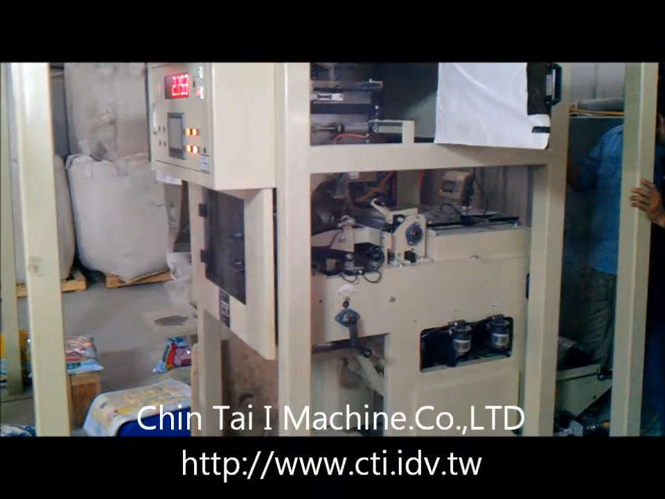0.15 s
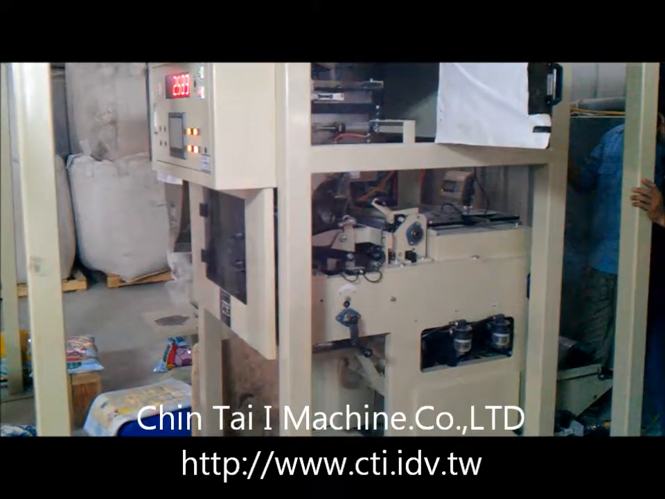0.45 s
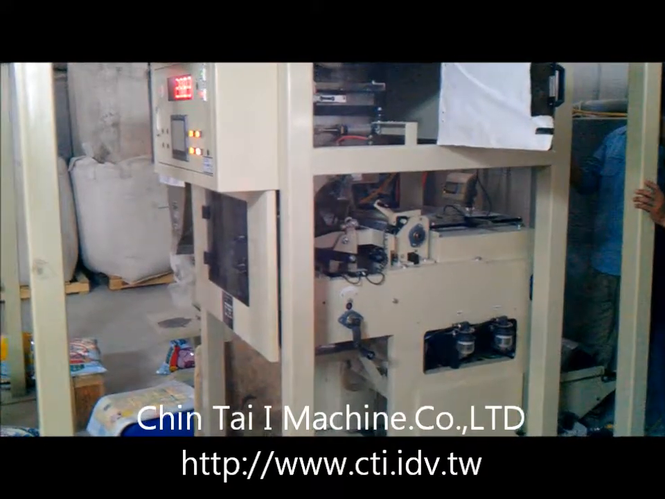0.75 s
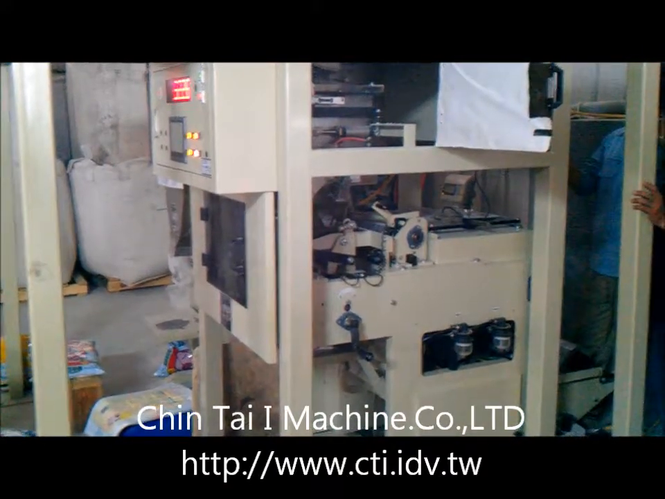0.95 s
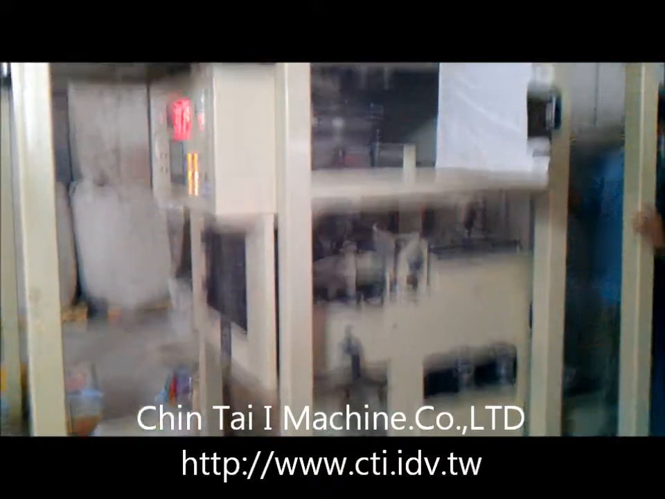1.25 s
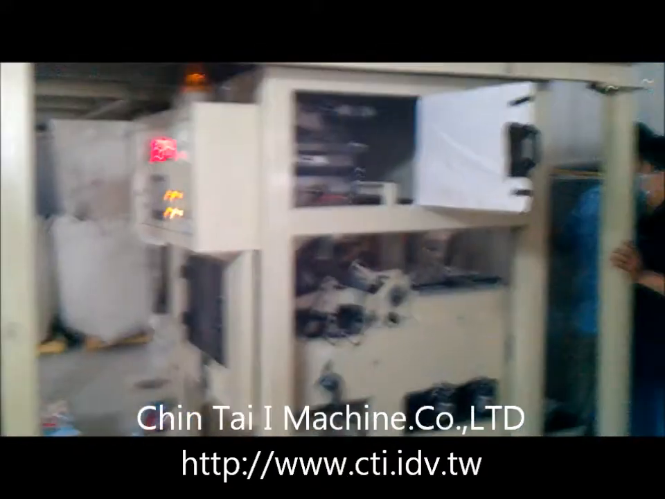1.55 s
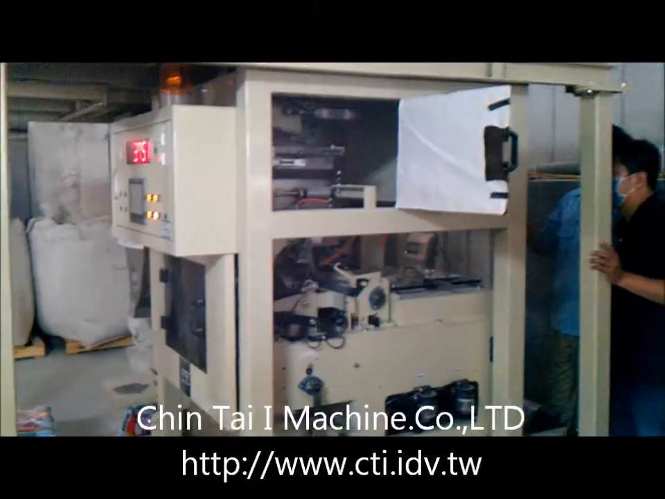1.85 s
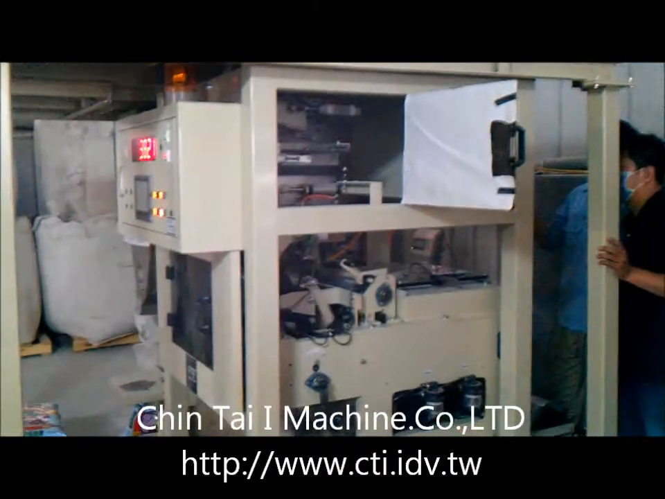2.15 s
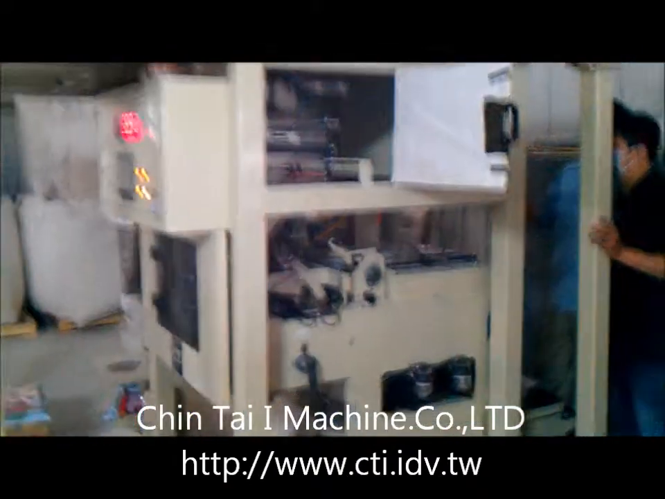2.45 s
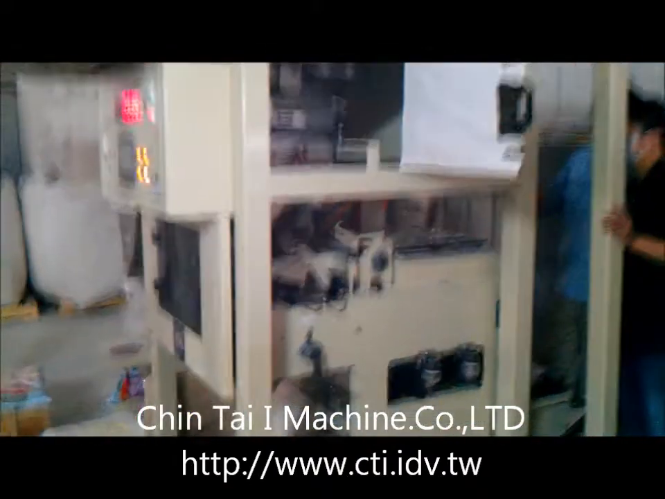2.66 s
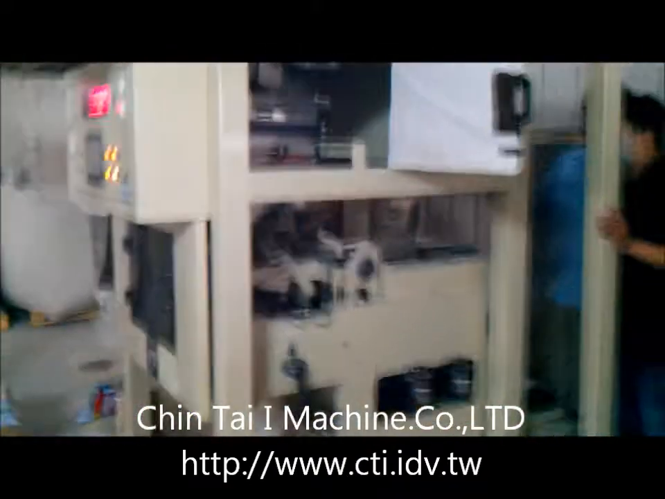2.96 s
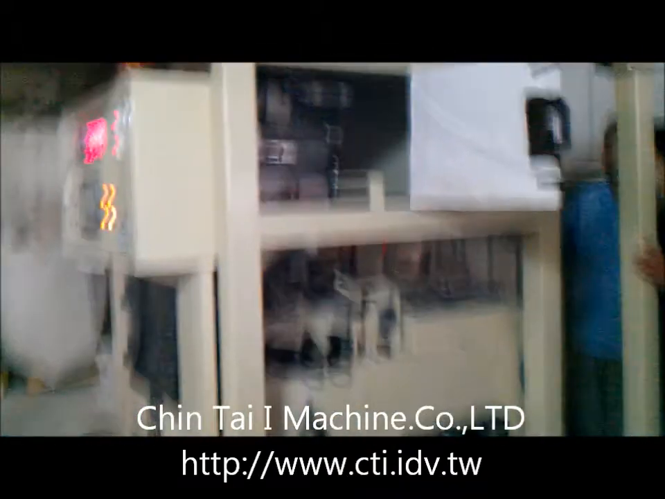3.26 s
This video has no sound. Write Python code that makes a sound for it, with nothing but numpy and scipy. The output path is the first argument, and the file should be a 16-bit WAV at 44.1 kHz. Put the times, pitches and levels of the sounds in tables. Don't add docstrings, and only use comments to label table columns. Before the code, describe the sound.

A packing machine hums, whines and chugs with rapid air puffs, stops, then a loud air jet opens and holds with scattered clanks, in a noisy factory hall, close overloaded phone microphone.

```python
import sys
import numpy as np
from scipy import signal
from scipy.fft import rfft, irfft
from scipy.io import wavfile
from scipy.ndimage import uniform_filter1d

SR = 44100
rng = np.random.default_rng(int(sys.argv[2]) if len(sys.argv) > 2 else 0)


def master(y):
    cut = np.clip(np.atleast_2d(y).T, -1, 1)
    pcm = np.round(cut * 32767)
    wavfile.write(sys.argv[1], SR, pcm.astype(np.int16))


def gain_from_db(level_db):
    decades = np.asarray(level_db, float) / 20
    return 10 ** decades


N = 149940
t = np.arange(N) / SR

# pitch_hz, density_db (per Hz)
HALL_SPECTRUM = [(25, -34.5), (150, -8), (450, -8.5), (800, -7), (2000, -8), (3400, -15.5), (7900, -16),
                 (15500, -21)]
# pitch_hz, level_db (rms)
MOTOR_TONES = [(346.8, -43.5), (693.7, -47.5), (867.1, -47), (1736, -53)]
# pitch_hz, level_db (rms)
GEAR_TONES = [(384.2, -36), (563.2, -48.5), (666.1, -41.5), (896.4, -50), (1114, -56), (2081, -47),
              (5148, -41.5)]
# place_turns (0-1), puff_db, thump_db
CAM_STROKES = [
    (.51, -23.5, -30),
    (0.79, -23.5, -26.5),
    (0.15, -32, -35),
    (0.4, -32, -60),
]
# pitch_hz, density_db (per Hz)
PUFF_SPECTRUM = [(3240, -40), (5500, -24), (7990, 5), (8950, 1.5), (12500, -3.5), (15500, -36)]
# time_s, level_db
LEAK_LEVEL = [(0, -24.5), (.3, -30), (.385, -21.5), (.45, -26.5), (.57, -27.5), (.62, -21.5), (.7, -28.5),
              (.78, -36), (.94, -30.5)]
# start_s, level_db, bright_share (0-1), fade_s, ring_hz
CLANK_HITS = [(.375, -18.5, 0.75, 0.0078, 850), (.612, -19, 0.8, 0.017, 4300),
              (1.7243, -20.5, 0.99, 0.08, 4770), (1.8414, -22, 0.84, 0.05, 2240),
              (1.9472, -16.5, 0.76, 0.014, 1590), (2.1234, -22, 0.64, 0.065, 5050),
              (2.166, -28, .1, 0.041, 310), (2.2941, -20.5, 0.66, 0.05, 1064), (2.715, -29, .1, 0.022, 980),
              (2.739, -23, 0.73, 0.022, 2230), (2.7725, -18.5, 0.82, 0.014, 4400),
              (2.8409, -23.5, 0.5, 0.015, 3360), (2.8993, -23.5, 0.1, 0.022, 190),
              (3.11, -32.5, 0, 0.016, 152), (3.309, -28, .3, 0.034, 183), (3.3408, -24, 0.3, 0.023, 868),
              (3.357, -24, 0, 0.018, 1940)]
# pitch_hz, density_db (per Hz)
JET_BEFORE = [(1500, -29), (3600, -23.5), (6300, -16), (7500, -7), (8640, -1.5), (10700, -8.5),
              (12000, -14), (15500, -21)]
# pitch_hz, density_db (per Hz)
JET_AFTER = [(1500, -28.5), (2600, -34.5), (4300, -22.5), (6000, -19), (8400, -1), (10000, -4),
             (12000, -12.5), (15500, -21)]
# pitch_hz, width_hz, before_db, after_db
NOZZLE_PEAKS = [(7356, 74, -26, -30.5), (7870, 430, -19, -27), (8830, 240, -21, -33),
                (9410, 160, -26.5, -34), (10750, 350, -30.5, -41), (12300, 250, -34, -56),
                (14400, 470, -45, -43), (8580, 580, -42, -23), (9600, 1500, -30, -23.5)]
# time_s, gain_db
PHONE_GAIN = [(0, -0.5), (.945, -3), (.99, -8), (1.7, -16.5), (1.95, -6), (2.1, -6.5), (2.7, -7), (2.9, -8),
              (2.96, -3), (3.2, -2.5), (3.23, -7), (3.28, -2), (3.4, -10)]
# time_s, ceiling_amplitude
INPUT_CEILING = [(0, .45), (.948, .45), (.965, .275), (2.15, .275), (2.4, .34), (3.3, .38), (3.36, .5)]
# centre_s, low_hz, high_hz
SPLIT_BANDS = [(1.019, 11691, 13114), (1.02, 8160, 11133), (1.157, 4628, 5707), (1.228, 8160, 10444),
               (1.273, 14448, 15870), (1.297, 8935, 10444), (1.39, 4198, 5190), (1.39, 14448, 15870),
               (1.612, 4198, 5707), (1.622, 6868, 9066), (2.04, 5662, 6912), (2.04, 8160, 9755),
               (2.18, 5662, 6912), (2.18, 7471, 9066), (2.366, 4198, 5190), (2.366, 10227, 11822),
               (2.366, 12380, 13803), (2.436, 13758, 15870), (2.992, 5662, 7601), (3.109, 4198, 5707)]

TURN_S = 0.0781
OPEN_S, SHIFT_S = 0.9415, 2.087


def level(x, db):
    return x * gain_from_db(db) / np.sqrt(np.mean(x ** 2))


def walk(rate_hz):
    hold = int(SR / rate_hz)
    steps = np.repeat(rng.standard_normal(N // hold + 1), hold)
    return 1.34 * uniform_filter1d(uniform_filter1d(steps, hold), hold)[:N]


def peak(hz, width_hz, size=N):
    f = np.fft.rfftfreq(size, 1 / SR) + 1
    response = 1 / (1 + (2 * hz * np.log(f / hz) / width_hz) ** 2)
    return level(irfft(rfft(rng.standard_normal(size)) * response, size), 0)


def colour(points, swell_db, flicker_db):
    octave = np.log2(np.fft.rfftfreq(N, 1 / SR) + 1)
    hz, db = np.array(points, float).T
    spectrum = rfft(rng.standard_normal(N)) * gain_from_db(np.interp(octave, np.log2(hz), db))
    total = np.zeros(N)
    for centre in np.arange(4, 14.6, 0.5):
        band = irfft(spectrum * np.clip(1 - 2 * abs(octave - centre), 0, 1), N)
        total += band * gain_from_db(flicker_db * walk(11.97))
    return level(total * gain_from_db(swell_db * walk(3.11)), 0)


def ramp(start_s, rise_s):
    return np.clip((t - start_s) / rise_s, 0, 1)


def curve(rows):
    return gain_from_db(np.interp(t, *np.array(rows, float).T))


def lines(rows, wobble_db):
    total = np.zeros(N)
    for hz, db in rows:
        loudness = np.sqrt(2) * gain_from_db(db + wobble_db * walk(13))
        waver_s = 0.00015 * walk(9)
        total += loudness * np.sin(2 * np.pi * (hz * (t + waver_s) + rng.random()))
    return total


def hall():
    noise = gain_from_db(-24.5) * colour(HALL_SPECTRUM, swell_db=0.8, flicker_db=0.87)
    gain = curve(PHONE_GAIN)
    recovery = np.where(t > 1, np.minimum(gain_from_db(-9.5) / gain, 1), 1)
    return noise * gain ** 0.176 * recovery


def motor():
    return gain_from_db(5.5) * lines(MOTOR_TONES, wobble_db=2.5)


def gears():
    squeal = gain_from_db(-36.5 + 2.5 * walk(21.2)) * peak(5140, 300)
    throb = gain_from_db(3.5 * np.sin(2 * np.pi * (t / TURN_S - 0.3)))
    return throb * (lines(GEAR_TONES, wobble_db=1.8) + squeal)


def cam():
    puffs = thumps = 0
    puff_s, thump_hz, thump_s = 0.018, 88, 0.0025
    for place, puff_db, thump_db in CAM_STROKES:
        turn, phase = np.divmod(t / TURN_S - place + 1, 1)
        ago = phase * TURN_S
        vary = gain_from_db(0.5 * rng.standard_normal(50))[turn.astype(int)]
        puffs = puffs + gain_from_db(puff_db) * vary * np.exp(-ago / puff_s) * np.clip(ago / 0.0015, 0, 1)
        near = (ago + TURN_S / 2) % TURN_S - TURN_S / 2
        thumps = thumps - gain_from_db(thump_db) * np.sin(2 * np.pi * thump_hz * near) * np.exp(-(near / thump_s) ** 2)
    return puffs * colour(PUFF_SPECTRUM, 0, 0) + thumps


def drive():
    leak = curve(LEAK_LEVEL) * peak(7870, 2600)
    stop_s, coast_s = 0.945, 0.025
    return (gears() + leak + cam()) * (1 - ramp(stop_s, coast_s))


def clanks():
    size = SR // 2
    out = np.zeros(N + size)
    u = np.arange(size) / SR
    for start_s, db, bright, fade_s, ring_hz in CLANK_HITS:
        bright = np.clip(bright, 0, 1)
        body = np.sqrt(1 - bright) * peak(1190, 3000, size)
        bright_noise = np.sqrt(bright) * peak(5520, 6000, size)
        rattle = (body + bright_noise) * (1 - np.exp(-u / 0.008)) * np.exp(-u / fade_s)
        ring_s = min(30 / ring_hz, 0.02)
        ring = np.sin(2 * np.pi * ring_hz * u) * np.clip(u / 0.0013, 0, 1) * np.exp(-u / ring_s)
        i = int(start_s * SR)
        out[i:i + size] += 2 * gain_from_db(db) * (rattle + gain_from_db(-12) * ring)
    return out[:N]


def jet():
    before = gain_from_db(-13) * colour(JET_BEFORE, swell_db=0.19, flicker_db=1.66)
    after = gain_from_db(-15) * colour(JET_AFTER, swell_db=0.1, flicker_db=1.66)
    burst = gain_from_db(3 * np.exp(-np.clip(t - OPEN_S, 0, None) / 0.08))
    for hz, width_hz, before_db, after_db in NOZZLE_PEAKS:
        ring = peak(hz, width_hz) * gain_from_db(0.9 * walk(9))
        before = before + gain_from_db(before_db) * burst * ring
        after = after + gain_from_db(after_db) * ring
    shift_fade_s = 0.006
    shift = ramp(SHIFT_S - shift_fade_s, shift_fade_s)
    hiss = before * np.sqrt(1 - shift) + after * np.sqrt(shift)
    dip = 1 - 0.1 * shift * (1 - ramp(SHIFT_S + 0.0094, 0.025))
    hold_s, fall_s = 0.018, 0.045
    whistle = gain_from_db(-6) * np.exp(-np.clip(t - SHIFT_S - hold_s, 0, None) / fall_s) * peak(8710, 130)
    return ramp(OPEN_S, 0.004) * (dip * hiss + shift * whistle)


def scene():
    mono = curve(PHONE_GAIN) * (hall() + motor()) + drive() + clanks() + jet()
    return np.array([mono, mono])


def input_stage(x):
    ceiling = np.interp(t, *np.array(INPUT_CEILING).T)
    knee = 3.0
    fine = signal.resample_poly(x / ceiling, 2, 1)
    return ceiling * signal.resample_poly(fine / (1 + abs(fine) ** knee) ** (1 / knee), 1, 2)


def split_ears(mono):
    out = np.array([mono, mono])
    size = int(0.042 * SR)
    f = np.fft.rfftfreq(size, 1 / SR)
    fade_in = signal.windows.hann(size) ** 0.7
    fade_out = 1 - np.sqrt(1 - fade_in ** 2)
    for centre_s, low_hz, high_hz in SPLIT_BANDS:
        i = int(centre_s * SR) - size // 2
        band = (f > low_hz) & (f < high_hz)
        old = irfft(rfft(out[0, i:i + size]) * band, size)
        new = irfft(rfft(rng.standard_normal((2, size))) * band, size)
        out[:, i:i + size] += fade_in * level(new, 0) * np.std(old) - fade_out * old
    return out


def top_cut(x):
    return signal.sosfilt(signal.butter(12, 15790, fs=SR, output="sos"), x)


def record(dry):
    mix = split_ears(input_stage(dry[0]))
    return top_cut(mix)


dry = scene()
out = record(dry)
master(out)
```